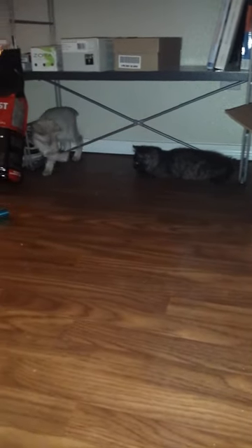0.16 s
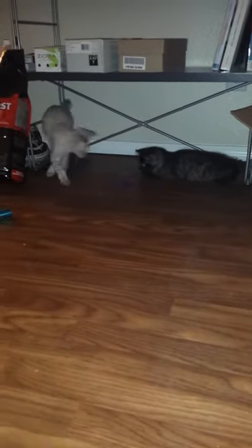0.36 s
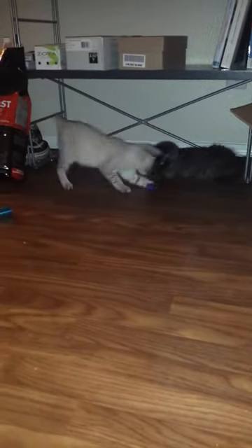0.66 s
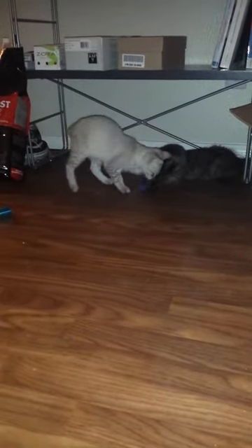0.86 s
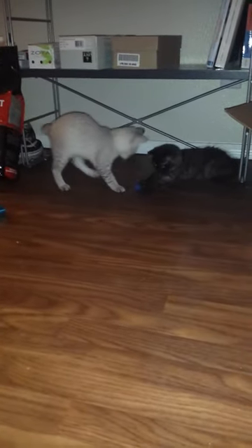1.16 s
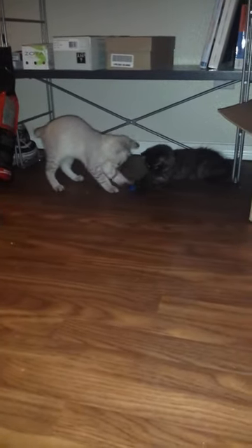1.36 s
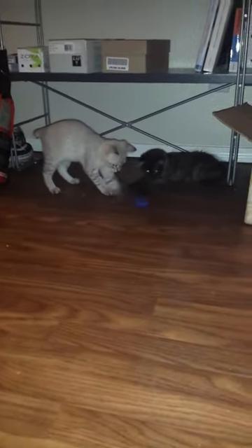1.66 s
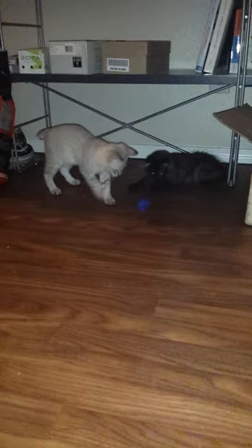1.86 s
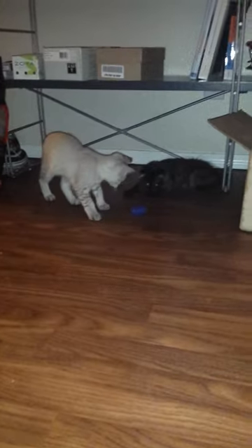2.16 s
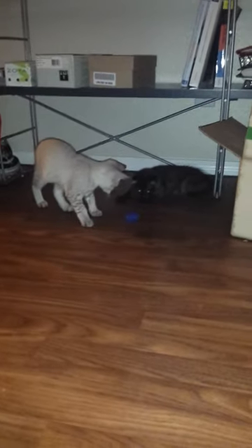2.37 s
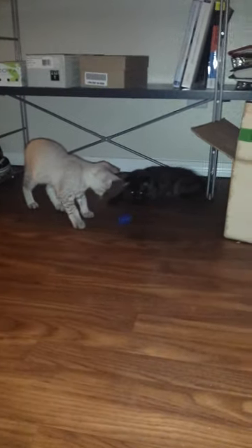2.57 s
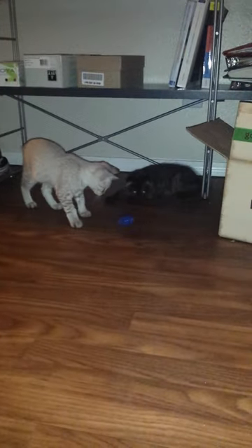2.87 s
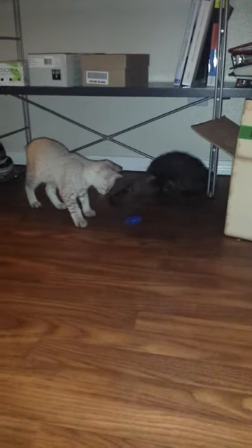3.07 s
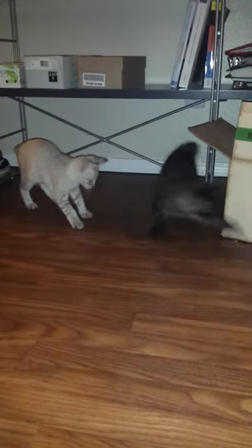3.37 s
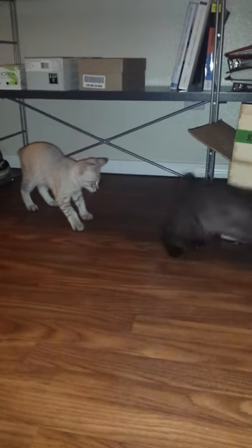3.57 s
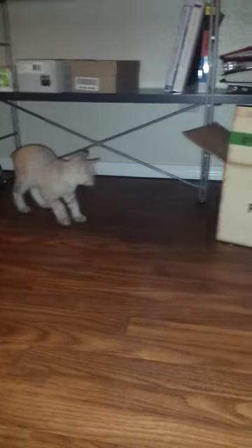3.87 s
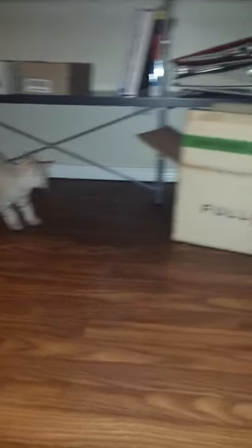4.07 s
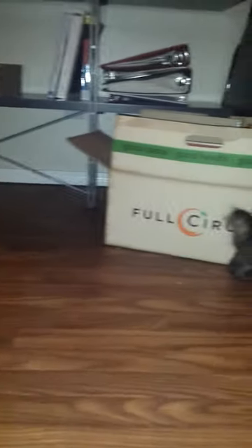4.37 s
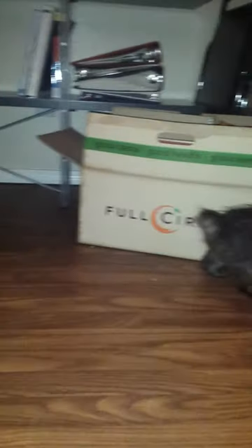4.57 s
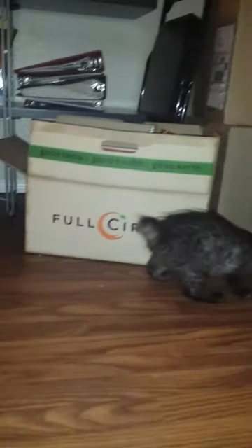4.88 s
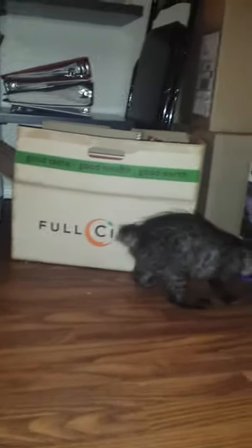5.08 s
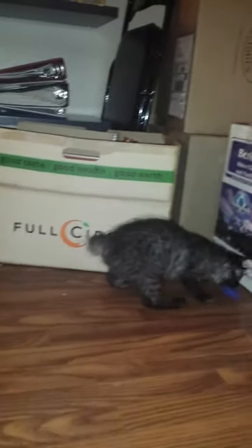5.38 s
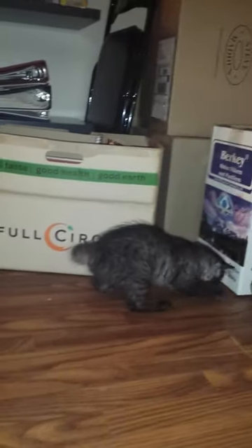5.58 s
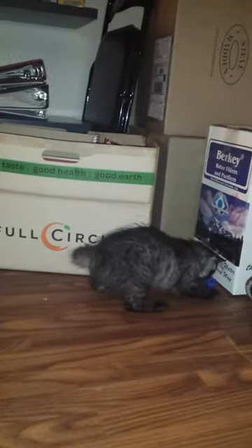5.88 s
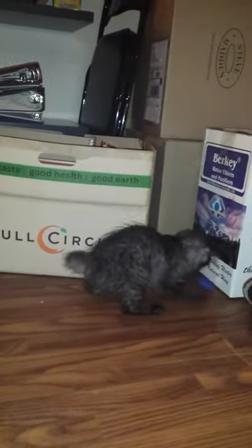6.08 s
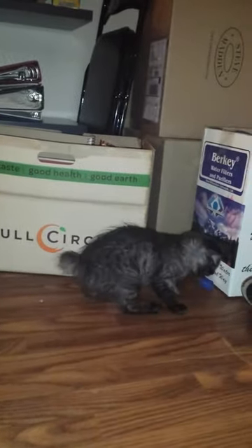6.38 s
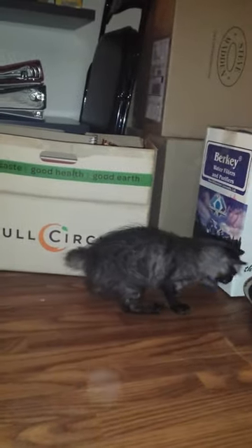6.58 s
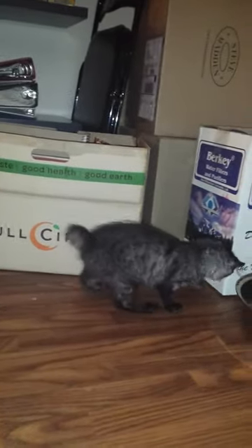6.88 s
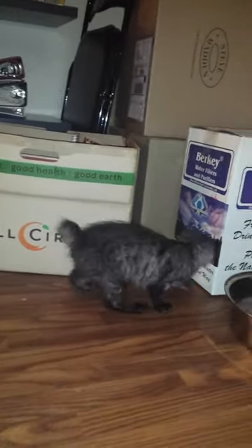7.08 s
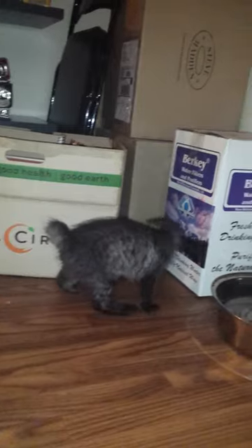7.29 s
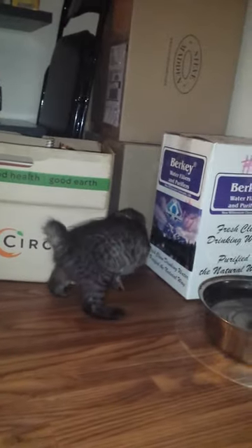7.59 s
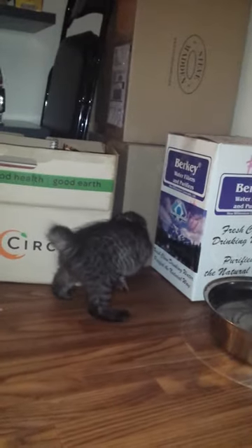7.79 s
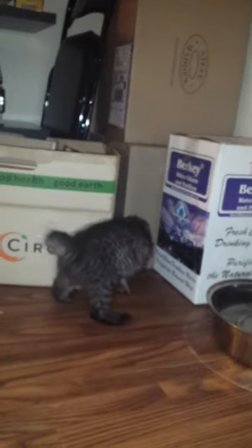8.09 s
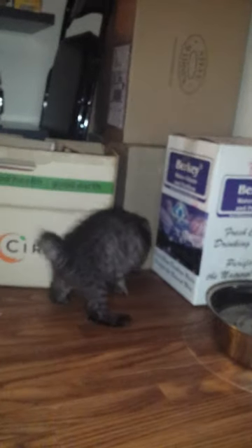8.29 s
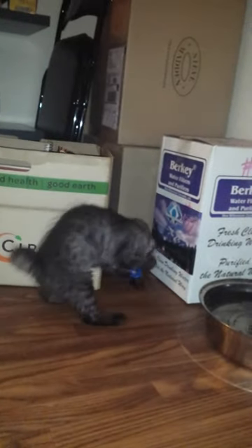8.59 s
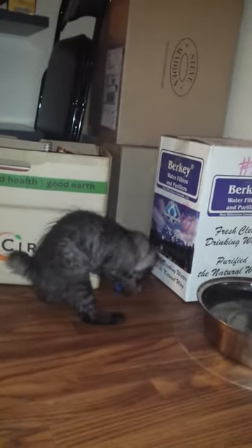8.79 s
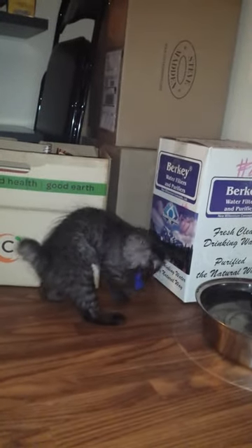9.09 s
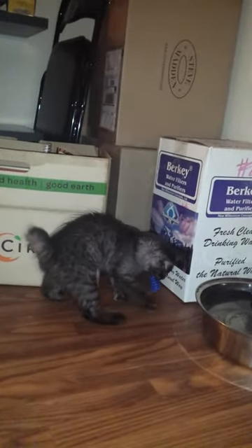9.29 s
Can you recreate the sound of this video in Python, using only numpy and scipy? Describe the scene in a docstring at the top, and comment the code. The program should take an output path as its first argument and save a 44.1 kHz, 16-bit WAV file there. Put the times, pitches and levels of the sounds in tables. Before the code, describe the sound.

In a small room, kitten paws thud and scuff softly on a wooden floor. A light plastic toy clatters across the boards in a quick, sharp burst, then after a few light ticks knocks against hollow cardboard boxes. Faint trickling water, a steady motor hum and soft room noise continue behind. Near the end a camera's focus whines thinly, close on the right.

```python
"""A light plastic toy clatters across a wooden floor, batted by one of two kittens in a small room, then
knocks against cardboard cartons. Each hit is a sharp pulse and a short ring of what is struck; paws
thud and scuff in between. Behind them water trickles, each drip a ringing bubble, over a motor's hum
and soft room noise. Short crisp ticks come from light contacts and the splashes of three drips.
Near the end a camera's focus drive whines briefly on the right."""
import sys
import numpy as np
from scipy import signal
from scipy.fft import rfft, irfft
from scipy.io import wavfile

SR = 44100
rng = np.random.default_rng(int(sys.argv[2]) if len(sys.argv) > 2 else 0)


def pcm_store(signal):
    """Save signal as 16-bit PCM."""
    levels = np.round(np.clip(np.atleast_2d(signal), -1, 1) * 32767)
    wavfile.write(sys.argv[1], SR, levels.astype(np.int16).T)


N = 416744
TIME = np.arange(N) / SR


def from_db(db):
    """Decibels to gain."""
    return 10 ** (np.asarray(db) / 20)


def unit_rms(x):
    """Scale to an rms of one."""
    return x / np.sqrt(np.mean(x ** 2) + 1e-30)


def at_hz(points, hz):
    """Read a curve on a log-frequency axis."""
    point_hz, value = np.transpose(points)
    return np.interp(np.log(np.maximum(hz, 1)), np.log(point_hz), value)


def automation(points):
    """Read a time curve at every sample."""
    return np.interp(TIME, *np.transpose(points))


def band(x, low_hz, high_hz, order=2):
    """Causal band-pass."""
    edges_hz = [low_hz, min(high_hz, SR / 2 - 1000)]
    return signal.sosfilt(signal.butter(order, edges_hz, "band", fs=SR, output="sos"), x)


def decay(t, t60_s):
    """Exponential decay, 60 dB down at t60_s."""
    return np.exp(-np.log(1000) * t / t60_s)


def pan(left_db):
    """Constant-power stereo gains, the left louder by left_db."""
    return unit_rms(from_db([[left_db / 2], [-left_db / 2]]))


def drift(per_s):
    """A slow random wander of unit rms."""
    knots = rng.standard_normal(int(N / SR * per_s) + 2)
    return unit_rms(np.interp(TIME * per_s, np.arange(len(knots)), knots))


def stereo_noise(size, correlation):
    """White noise, partly alike left and right."""
    mid, side = rng.standard_normal((2, size))
    return np.sqrt((1 + correlation) / 2) * mid + np.sqrt((1 - correlation) / 2) * side * [[1], [-1]]


def add(out, start_s, sound):
    """Mix a sound in at start_s."""
    i = max(0, int(start_s * SR))
    out[:, i:i + sound.shape[1]] += sound[:, :max(0, N - i)]


def resonate(x, modes):
    """Each mode lifts and prolongs its own narrow band."""
    for hz, width_hz, lift_db in modes:
        x = x + (from_db(lift_db) - 1) * signal.lfilter(*signal.iirpeak(hz, hz / width_hz, fs=SR), x)
    return x


# Spectrum of the room and microphone noise: frequency_hz, density_db (per Hz)
NOISE_SPECTRUM = [(25, -101), (55, -96), (80, -91.5), (112, -89), (150, -95.5), (290, -93.5), (345, -89),
                  (440, -92), (620, -101), (1400, -105), (3000, -106), (6200, -101.5), (8500, -103.5),
                  (15000, -105)]
# How centred that noise is: frequency_hz, correlation (0-1)
NOISE_CORRELATION = [(30, .65), (120, 0.5), (350, 0.59), (1000, 0.2), (3000, 0), (12000, 0.06)]
# Its gentle level ride: time_s, gain_db
NOISE_RIDE = [(0, 0.5), (2.9, 0), (4.6, 3), (5.05, -0.5), (6.9, 0.5), (8.4, 2), (9.45, 1)]


def room_tone():
    """A low, fairly centred room rumble under a smooth, wide hiss."""
    hz = np.arange(N // 2 + 1) * SR / N
    mid, side = rfft(rng.standard_normal((2, N)))
    correlation = at_hz(NOISE_CORRELATION, hz)
    white = np.sqrt(1 + correlation) * mid + np.sqrt(1 - correlation) * side * [[1], [-1]]
    noise = irfft(white * from_db(at_hz(NOISE_SPECTRUM, hz)), N) * np.sqrt(SR) / 2
    return noise * from_db(automation(NOISE_RIDE))


def wavering_tone(hz, level_db, waver):
    """A sine that wavers in strength and phase."""
    phase = 2 * np.pi * hz * TIME
    tone = (1 + waver * drift(12)) * np.cos(phase) + waver * drift(9) * np.sin(phase)
    return from_db(level_db) * unit_rms(tone)


# The motor's middle tones: pitch_hz, level_db, waver (0-1)
MOTOR_TONES = [(179, -77.5, 0), (234, -79.5, 0.3), (306, -74.5, .5), (345.4, -70, .8)]
# Swells of its outer tones as the microphone moves through their standing waves: time_s, level_db
LOW_HUM_RIDE = [(0, -65), (1.5, -67.5), (2.6, -72), (4.1, -75), (5.1, -83), (6.05, -85), (6.4, -71),
                (7.5, -70), (7.9, -65), (9.45, -65.5)]
HIGH_HUM_RIDE = [(0.0, -66), (3.29, -64.5), (4.16, -61), (4.82, -64), (7.47, -63), (7.76, -61), (9.45, -62)]


def motor_hum():
    """A small motor sounds mains harmonics and wavering casing tones."""
    low = wavering_tone(hz=120.2, level_db=automation(LOW_HUM_RIDE), waver=.06)
    high = wavering_tone(hz=420, level_db=automation(HIGH_HUM_RIDE) + .5, waver=.073)
    middle = sum(wavering_tone(*tone) for tone in MOTOR_TONES)
    return (low + high + middle) * pan(.22)


def trickle(per_s, level_db, low_hz, high_hz, count=300):
    """A steady flow drips in loose time, high drips louder. Rows: start_s, pitch_hz, level_db."""
    late, height, force = rng.random((count, 3)).T
    start_s = (np.arange(count) + late) / per_s
    pitch_hz = low_hz * (high_hz / low_hz) ** height
    octaves = np.log2(pitch_hz / np.sqrt(low_hz * high_hz))
    drip_db = level_db + 4.5 * octaves + 3 * (2 * force - 1)
    return np.transpose([start_s, pitch_hz, drip_db])[start_s < N / SR]


def drip(hz, rise=.04, fizz_db=3.5, fizz_width=.051):
    """A drip traps a bubble that rings and rises in pitch, amid a fizz of like-sized ones."""
    t = TIME[:SR // 10]
    life_s = .04 * 2000 / hz   # small bubbles die sooner
    glide_hz = hz * (1 + rise * (np.minimum(t / life_s, 1) - .15))
    ping = unit_rms(np.sin(2 * np.pi * np.cumsum(glide_hz) / SR) * decay(t, life_s))
    fizz = signal.lfilter(*signal.iirpeak(hz, 1 / fizz_width, fs=SR), stereo_noise(len(t), .38))
    fizz = unit_rms(fizz * decay(t, t60_s=.065))
    return unit_rms(ping + from_db(fizz_db) * fizz)


# Big drips that stand out of the trickle: start_s, pitch_hz, level_db
BIG_DRIPS = [(.482, 1890, -70.5), (.996, 2440, -69), (1.047, 6580, -71), (1.245, 2520, -72),
             (1.564, 1820, -59), (1.566, 5900, -64.5), (1.891, 2336, -68), (2.047, 4340, -64),
             (2.196, 3330, -65.5), (2.313, 2040, -67), (2.37, 5200, -62), (2.53, 5560, -67),
             (2.704, 6300, -67), (2.951, 4670, -68), (3.025, 3010, -66.5), (4.245, 4270, -67.5),
             (4.285, 5730, -65), (4.354, 5850, -59), (4.48, 2090, -65.5), (4.533, 1810, -64),
             (4.527, 4160, -67.5), (4.891, 6100, -65.5), (5.598, 2710, -69), (5.805, 6200, -63.5),
             (5.807, 1950, -66), (5.89, 2700, -65), (6.081, 2170, -64), (6.152, 3000, -65.5),
             (6.254, 5500, -63), (6.35, 5260, -67), (6.513, 2730, -67.5), (6.675, 1900, -61.5),
             (7.421, 2140, -60.5), (7.484, 6400, -64.5), (8.042, 1870, -63.5), (8.433, 3270, -67),
             (8.549, 5660, -64.5), (8.718, 5720, -65), (8.81, 6100, -59.5), (9.094, 4800, -64.5)]


def water(rebound_s=.014, rebound_db=-8.5):
    """Big drips, small drips and fine droplets fall into the same basin."""
    small = trickle(per_s=8.7, level_db=-72, low_hz=1810, high_hz=7000)
    fine = trickle(per_s=15, level_db=-76, low_hz=2890, high_hz=7570)
    falls = [*BIG_DRIPS, *small, *fine]
    rebounds = []   # each splash throws up a droplet that falls back and makes a smaller bubble
    for start_s, hz, level_db in falls:
        late, smaller = rng.random(2)
        rebounds.append((start_s + rebound_s * (.5 + late), hz * (1 + smaller / 8), level_db + rebound_db))
    out = np.zeros((2, N))
    for start_s, hz, level_db in falls + rebounds:
        add(out, start_s, from_db(level_db) * drip(hz) * pan(rng.normal(2.5, 1.7)))
    return out


# Resonances of the hollow cartons, scuffed or knocked: pitch_hz, width_hz, lift_db
CARTON_MODES = [(497, 48, 9.5), (604, 70, 7), (1280, 220, 12.5), (2530, 470, 6.5), (3260, 130, 2),
                (4620, 65, 3.5), (6350, 1800, 6)]
# Fur, paws and toy sliding: peak_s, half_length_s, level_db, centre_hz, body_db (against the rub)
SCUFFS = [(.447, 0.74, -67, 5650, -5.5), (0.701, 0.027, -51.5, 5470, -12),
          (1.454, 0.018, -51.5, 4900, -10.5), (3.037, 0.021, -56, 4000, -12),
          (3.286, 0.023, -54.5, 3630, -3.5), (3.368, 0.056, -59, 6300, -10), (3.524, 0.02, -49.5, 5750, -8),
          (3.709, 0.13, -55.5, 5950, -3.5), (3.868, .022, -42, 4500, -3), (3.916, .009, -50, 5550, -3.5),
          (5.29, 0.072, -63.5, 3050, -5), (6.246, .15, -62.5, 6020, -8.5), (7.59, .017, -52.5, 5940, -12),
          (7.7, 0.082, -53, 4030, 2.5), (7.802, .0081, -45, 6200, -19), (8.085, 0.038, -46.5, 1870, 0),
          (8.296, 0.022, -49, 4130, -2), (8.471, .028, -54.5, 3950, -13)]


def scuffs(grain_db=4.5, grain_samples=32):
    """Sliding is a swell of tiny catches that also stir the hollow cardboard."""
    out = np.zeros((2, N))
    t = TIME[:SR * 3 // 4] - 3 / 8   # zero at the peak of the swell
    for peak_s, half_length_s, level_db, centre_hz, body_db in SCUFFS:
        grains = rng.standard_normal(len(t) // grain_samples + 1)
        grip = from_db(grain_db * np.repeat(grains, grain_samples)[:len(t)])
        catches = resonate(stereo_noise(len(t), .41) * grip, CARTON_MODES)
        rub = band(catches, centre_hz * .49, centre_hz * 2.6, order=1)
        rub = unit_rms(band(rub, 600, 10500))
        body = from_db(body_db) * unit_rms(band(catches, 480, 1200))
        swell = np.exp(-(t / half_length_s) ** 2)
        add(out, peak_s + t[0], from_db(level_db) * (rub + body) * swell)
    return out


# Soft footfalls: start_s, level_db, pitch_hz
PAW_STEPS = [(.687, -38.5, 126), (0.887, -45, 107), (3.639, -35, 85), (3.79, -46, 94), (3.877, -35, 94.5),
             (4.004, -28.5, 177), (4.80, -46.5, 176), (5.299, -52.5, 201), (9.221, -42.5, 140)]


def paw_steps(t60_s=.12, rise_s=.0094, roughness=.32):
    """A soft pad pushes the boards, which answer with a low, rough thud."""
    out, t = np.zeros((2, N)), TIME[:SR // 4]
    envelope = decay(t, t60_s) * (1 - np.exp(-t / rise_s))
    for start_s, level_db, hz in PAW_STEPS:
        rumble = unit_rms(band(rng.standard_normal(len(t)), hz / 2, hz * 2))
        boards = np.sin(2 * np.pi * hz * t) + roughness * rumble
        add(out, start_s, from_db(level_db) * boards * envelope * pan(0))
    return out


# Borders of a hit's five bands (thump, body, clack, crack, air): edge_hz
HIT_EDGES_HZ = [90, 350, 1000, 2800, 7200, 15000]
# A hard contact trades bass for treble: share of hardness_db per band
HARDNESS_SHARE = [-1, -1, 0, 1, 1]
# A square hit rings the middle: share of clack_db per band
CLACK_SHARE = [-.5, 0, 1, .5, -.5]
# Lean of every hit towards the left microphone: left_db per band
LEFT_BIAS_DB = [0, -1, -1.5, 5.5, -12]
# Hits and reflections reach both microphones alike in the bass: frequency_hz, correlation (0-1)
MIC_CORRELATION = [(100, 0.96), (350, 0.93), (1000, 0.2), (3000, .05), (12000, 0.4)]


def impacts(hits, modes, eq_db, ring_t60_s, ring_db):
    """A contact is one sharp pulse and a dense, quickly dying ring, coloured by how it lands."""
    out, t = np.zeros((2, N)), TIME[:SR // 12]
    soften = signal.butter(1, 8700, fs=SR)
    for k, (low_hz, high_hz) in enumerate(zip(HIT_EDGES_HZ, HIT_EDGES_HZ[1:])):
        noise = np.array([stereo_noise(len(t), at_hz(MIC_CORRELATION, low_hz)) for _ in hits])
        force = from_db(ring_db) * decay(t, ring_t60_s[k]) * noise
        force[:, [0, 1], [0, 2]] += (-1) ** k   # the pulse arrives two samples sooner on the left
        ringing = resonate(signal.lfilter(*soften, force), modes)
        sounds = band(ringing, low_hz, high_hz, order=3)
        shadow = min(1, high_hz / HIT_EDGES_HZ[2]) / 2   # long waves bend round the camera
        for (start_s, level_db, hardness_db, clack_db, lean_db), sound in zip(hits, sounds):
            attack_rms = np.sqrt(np.mean(sound[:, t < .006] ** 2))
            band_db = level_db + eq_db[k] + hardness_db * HARDNESS_SHARE[k] + clack_db * CLACK_SHARE[k]
            left_db = lean_db * shadow + LEFT_BIAS_DB[k]
            add(out, start_s, sound / attack_rms * from_db(band_db) * pan(left_db))
    return out


# Short crisp ticks: light contacts, and the splashes of three water drips (5.806, 6.083, 6.152 s):
# start_s, level_db, hardness_db, clack_db, lean_db (leftward; pans by half or less)
TICKS = [(2.997, -59.5, 10.5, -2.5, 7), (4.797, -54.5, -1.5, -5, 19), (5.275, -59.5, 4.5, -3, 6.5),
         (5.338, -54.5, -3, -3, -12.5), (5.806, -59.5, 2, -1, -3), (6.083, -64, -4, 5.5, 0),
         (6.152, -61, 2, 6, 0), (7.024, -60, -1, 1.5, -10), (8.046, -57, 5, -7, -13.5),
         (8.459, -55, 2, -1, 0)]
# Their crisp colour: gain_db per band
TICK_EQ_DB = [-5, -4, 1, 4, -6.5]


def ticks():
    """Light contacts and three drip splashes: very short bursts of noise with no body resonance."""
    return impacts(TICKS, [], TICK_EQ_DB, ring_t60_s=[.015, .009, .024, .023, .024], ring_db=19)


# The toy hitting the boards: start_s, level_db, hardness_db, clack_db, lean_db
TOY_HITS = [(3.268, -50, 3.5, -9.5, 8), (3.4213, -39, 0.5, -6, 4), (3.426, -43, -8, -9, 6),
            (3.4675, -37, -4, 6, 0), (3.473, -38, -3, 0.5, 4), (3.492, -42, 3.5, -2, 6),
            (3.6318, -33, 6.5, 4, -3), (3.638, -35.5, 2, 2, 4.5), (3.9454, -31, 7.5, 4.5, 9),
            (3.9515, -27, 4, 2.5, 3), (3.994, -28, -2, -3.5, 9), (4.001, -30.5, 4, 13, 1.5),
            (4.0115, -25, -0.5, -3, 9.5), (4.029, -33.5, -6, -9.5, 2), (4.036, -29.5, -1, 1.5, 1)]
# Resonances of toy and boards: pitch_hz, width_hz, lift_db
TOY_MODES = [(175.6, 60, 0), (240, 40, 6.5), (320, 40, 6.5), (500, 34, 4), (563, 45, 10.5), (978, 48, 10.5),
             (1240, 50, 4), (1350, 18, 3.5), (1778, 240, 8), (3040, 110, 8), (3440, 79, 4), (4270, 160, 5),
             (5890, 860, 9)]
# The clatter's thin, bright colour: gain_db per band
TOY_EQ_DB = [-13, -4.5, 0.5, 2.36, -9]


def toy_clatter():
    """Light plastic bounces on wood, and both ring briefly."""
    return impacts(TOY_HITS, TOY_MODES, TOY_EQ_DB, ring_t60_s=[.044, .073, .038, .039, .052], ring_db=-11)


# Toy and paws hitting the cartons: start_s, level_db, hardness_db, clack_db, lean_db
CARTON_HITS = [(6.705, -50, 1.5, 0.5, 3), (7.1115, -43, -2.5, -2.5, 2), (7.1445, -43, -1.5, 2, 0),
               (7.6055, -34.5, 11, 5, 5), (7.6275, -28.5, -2.5, -4, 4), (7.6325, -33.5, -4.5, 4.5, 4),
               (7.639, -33.5, -1, -2, 12), (7.658, -36, 6.5, 4, -3), (7.6635, -34.5, 2, 3.5, 9),
               (7.6865, -37.5, -5, -6, 5), (7.762, -36, -1, -0.5, 4), (7.7795, -35.5, -5.5, -4.5, 3),
               (7.788, -39, 1, 2, 3), (7.794, -49.5, 7, 10.5, 3), (7.822, -32, -0.5, 1.5, 2),
               (7.825, -38, 4, -2, 1), (7.861, -49, -3, -12, 1), (8.2785, -48, -5, 7, 2),
               (8.293, -46, 2, 3, 11), (8.3075, -39, -4.5, -2, 1), (8.316, -44.5, -7, -13, 6)]
# The knocks' boxy colour: gain_db per band
CARTON_EQ_DB = [-18.5, -0.5, -1, -0.5, -11]


def carton_knocks():
    """Knocks on cardboard ring the hollow cartons."""
    ring_t60_s = [.043, .04, .045, .039, .086]
    return impacts(CARTON_HITS, CARTON_MODES, CARTON_EQ_DB, ring_t60_s, ring_db=-14)


def focus_drive(start_s=8.13, end_s=9.21, ramp_s=.049, pitch_hz=10530, width_hz=910, level_db=-62):
    """A thin, narrow whirr while the lens moves, just beside the right microphone."""
    running = np.clip(np.minimum(TIME - start_s, end_s - TIME) / ramp_s, 0, 1)
    whirr = band(stereo_noise(N, .34), pitch_hz - width_hz / 2, pitch_hz + width_hz / 2, order=1)
    return from_db(level_db) * running * unit_rms(band(whirr, 10000, 15000)) * pan(-36)


# The small room's reverb: frequency_hz, t60_s, relative_level_db
REVERB = [(100, 0.36, -.5), (300, .3, 2), (650, 0.33, -5), (2016, 0.3, 0.5), (5960, 0.31, -0.5),
          (14270, 0.24, 4)]


def room(x, wet_db, build_s):
    """Diffuse reflections build up, then die away at each octave's own rate."""
    t, table = TIME[:SR // 2], np.array(REVERB)
    tail = 0
    for low_hz in 45 * 2. ** np.arange(9):
        hz = low_hz * np.sqrt(2)
        t60_s, level_db = at_hz(table[:, [0, 1]], hz), at_hz(table[:, [0, 2]], hz)
        reflections = band(stereo_noise(len(t), at_hz(MIC_CORRELATION, hz)), low_hz, 2 * low_hz)
        tail = tail + reflections * decay(t, t60_s) * from_db(level_db)
    build_up = 1 - np.exp(-(t / build_s) ** 2)
    response = unit_rms(tail * build_up) / np.sqrt(len(t))
    return x + from_db(wet_db) * signal.fftconvolve(x, response, axes=1)[:, :N]


def scene():
    """The kittens play up front, water and hum sit behind, all in one small room."""
    toy, cartons, crisp_ticks = toy_clatter(), carton_knocks(), ticks()
    feet = paw_steps() + scuffs()
    play = room(toy, wet_db=-5, build_s=.0052) + room(cartons + feet, wet_db=-4.5, build_s=.004)
    background = focus_drive() + motor_hum() + room_tone() + room(water(), wet_db=-.5, build_s=.0026)
    return play + crisp_ticks + background


def record(dry):
    """A steep low-pass cuts the top above 14.7 kHz."""
    return signal.sosfilt(signal.ellip(12, .1, 80, 14700, fs=SR, output="sos"), dry)


dry = scene()
out = record(dry)
pcm_store(out)
```